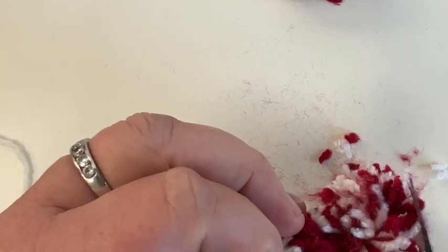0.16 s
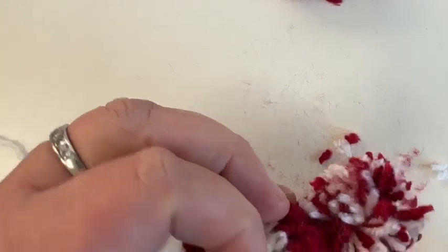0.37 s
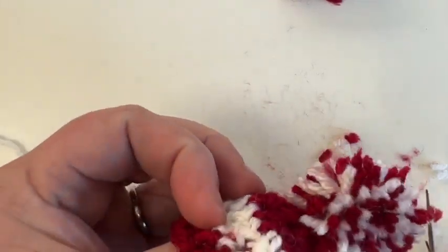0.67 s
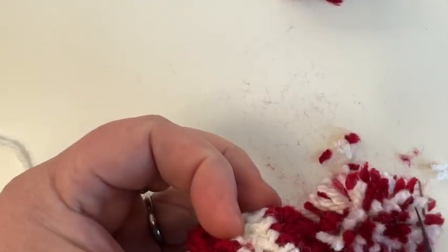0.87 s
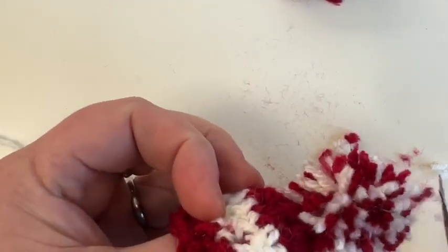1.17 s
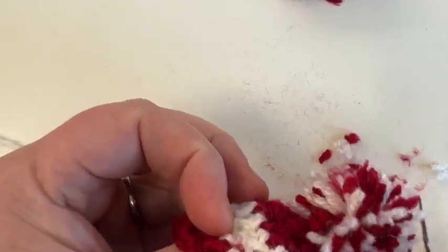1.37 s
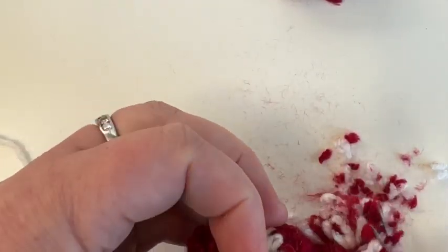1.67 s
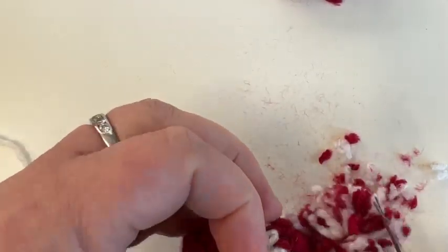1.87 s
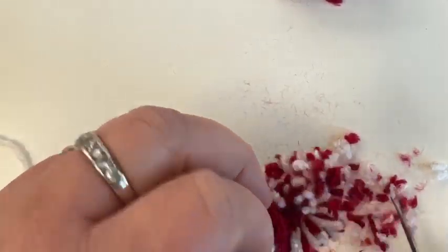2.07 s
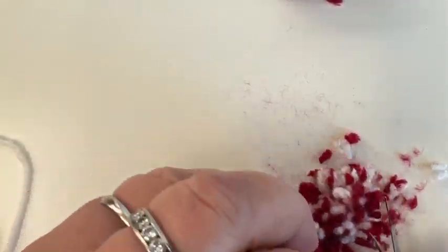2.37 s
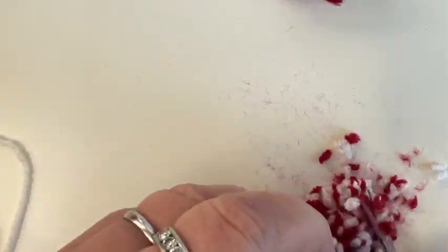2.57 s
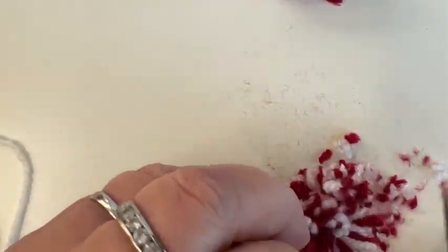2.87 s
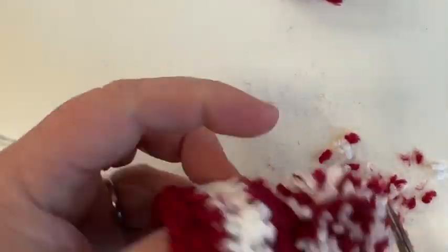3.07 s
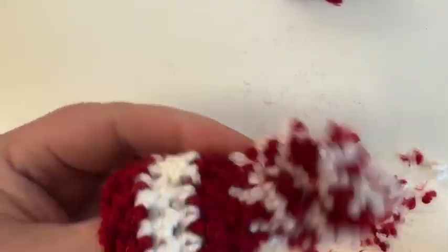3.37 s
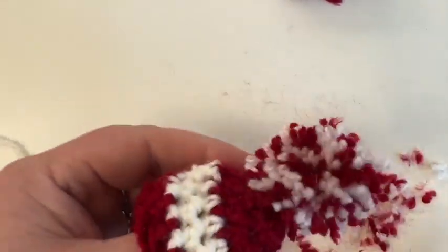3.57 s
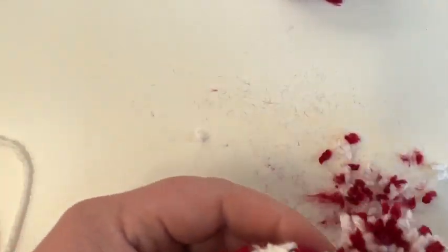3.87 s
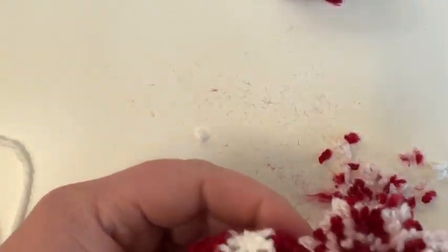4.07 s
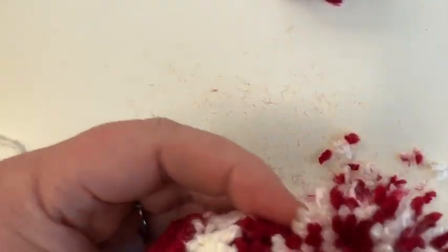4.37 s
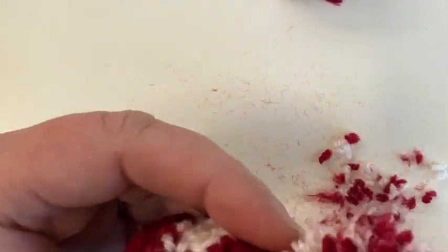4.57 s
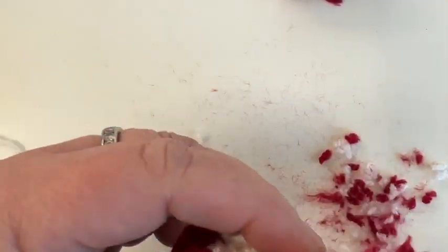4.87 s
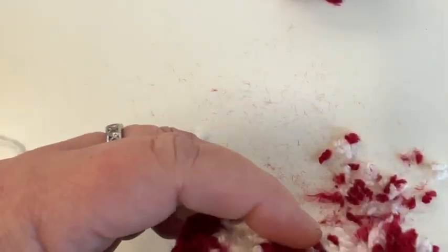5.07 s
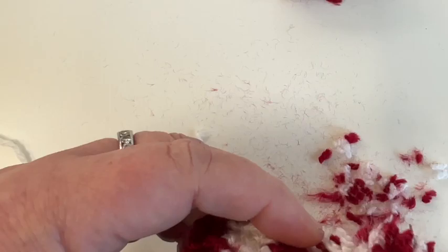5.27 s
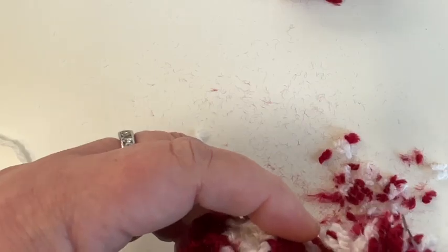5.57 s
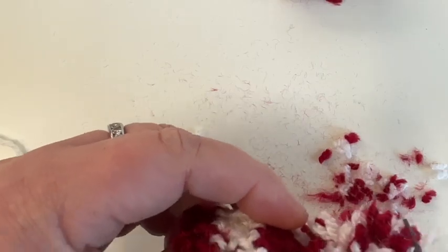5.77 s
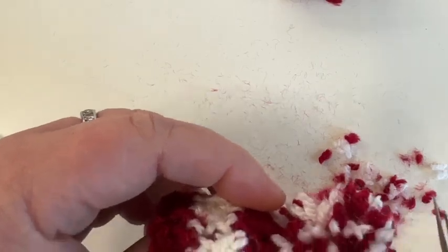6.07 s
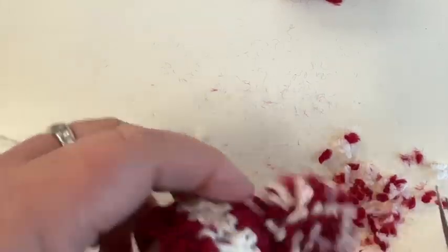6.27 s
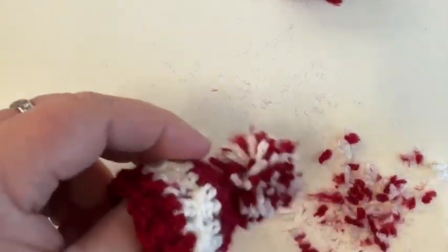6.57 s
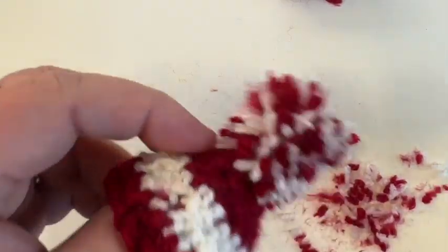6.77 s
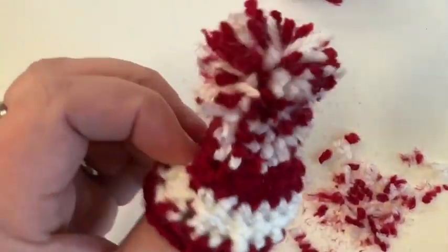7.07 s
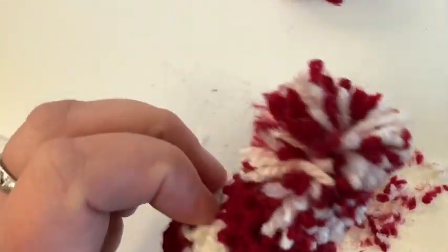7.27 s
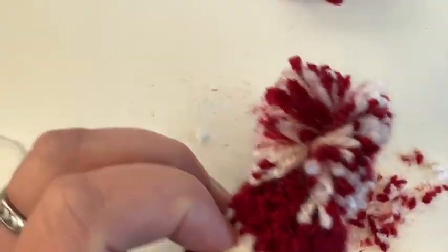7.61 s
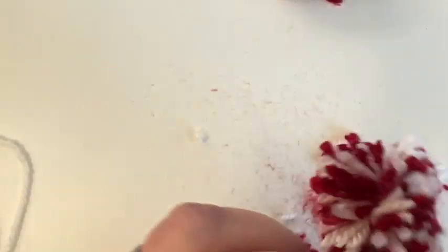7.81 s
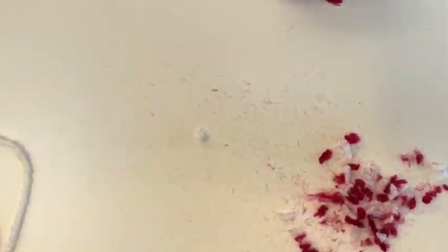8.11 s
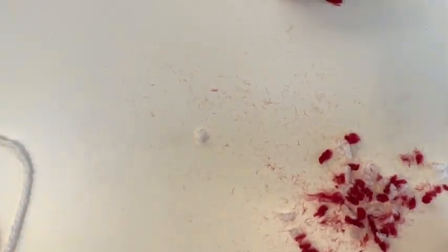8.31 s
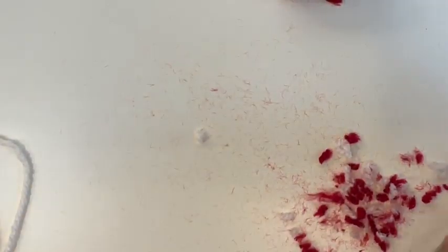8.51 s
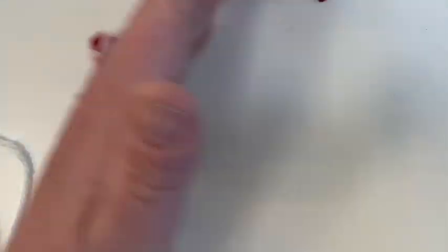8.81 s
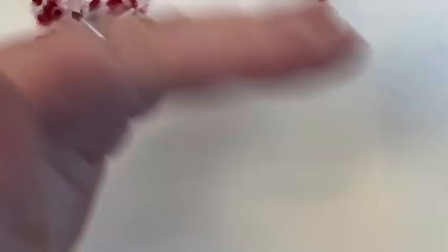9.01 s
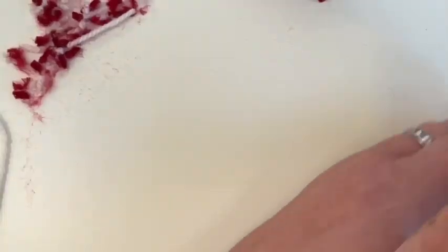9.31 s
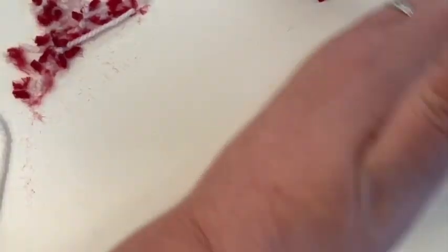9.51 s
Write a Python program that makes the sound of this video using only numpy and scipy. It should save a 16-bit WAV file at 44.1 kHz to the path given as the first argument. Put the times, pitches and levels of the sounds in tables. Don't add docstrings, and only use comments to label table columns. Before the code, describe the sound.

A quiet room with faint low rumble and soft ventilation hum, heard close by a phone. From 0 to 0.25 s small scissors shear yarn in rapid gritty snips, ending in a bright metallic click. More snips come around 0.9-1.05, 1.7-1.95 and 2.5 s, with faint blade slides as they open. At 2.8 s the scissors knock the table, blades jangling, with a brief rattle. It is mostly quiet, with tiny clicks near 3.55 and 4.2 s, until crunchy cutting at 5.5-5.75 s ends in a sharp snap; light clicks follow and another strong snap at 6.6 s. Wool rustles. The scissors are laid down at 7.15 s, then drop and rattle woodenly at 7.43-7.75 s. Two small clicks near 7.9 s. A palm lands softly at 8.13 s and sweeps with a swelling, hissing rub until 8.9 s; a low thump and second stroke run from 9.2 to about 9.65 s.

```python
import sys
import numpy as np
from scipy import signal
from scipy.fft import rfft, irfft
from scipy.io import wavfile
from scipy.ndimage import uniform_filter1d

SR = 44100
rng = np.random.default_rng(int(sys.argv[2]) if len(sys.argv) > 2 else 0)


def voltage_ratio(decibels):
    exponent = np.asarray(decibels, float) / 20
    return 10 ** exponent


def master_out(mix):
    frames = np.transpose(np.atleast_2d(mix))
    ceiling = np.clip(frames, -1, 1)
    pcm = np.round(ceiling * 32767).astype(np.int16)
    wavfile.write(sys.argv[1], SR, pcm)


N = 425562
HZ = np.fft.rfftfreq(N, 1 / SR)
TIME = np.arange(N) / SR

# (frequency [Hz], width [Hz], level [dB])
BLADE_MODES = [(1320, 130, -17), (2800, 260, -5), (3026, 180, -11), (4120, 850, -4), (4530, 900, -6.5),
               (6220, 450, -0.5), (7230, 460, 1), (8320, 720, -2.5), (10340, 900, -6), (11670, 400, -5),
               (15430, 1100, 1.5)]
# (frequency [Hz], level [dB], t60 [s])
TABLE_MODES = [(110, -5, 0.36), (135, 0.5, 0.092), (217.2, 3, 0.18), (280, 4.5, 0.06), (357.5, -1.5, 0.23),
               (413, -6.5, 0.21), (499, 6.5, 0.084), (660, 4, 0.068), (753, -1.5, 0.087), (865, -13, 0.1),
               (1020, -14, 0.025), (1114, -2, 0.012), (1396, -10, 0.022), (1676, -9, 0.01),
               (1880, -13, 0.0067), (2120, -12.5, 0.022), (2640, -21.5, 0.022)]
BOUNCE_SAMPLES = 75


def evened(x):
    return x / np.sqrt(np.mean(x ** 2) + 1e-30)


def peaked(x):
    return x / abs(x).max()


def read(points, hz):
    f, value = np.transpose(points)
    return np.interp(np.log(hz + 1), np.log(f + 1), value)


def colour(x, gain):
    return irfft(rfft(x) * gain, N)


def band(lo_hz, hi_hz):
    return 1 / np.sqrt((1 + (lo_hz / (HZ + 1)) ** 8) * (1 + (HZ / hi_hz) ** 8))


def resonance(hz, width_hz):
    return 1 / (1 + (2 * (HZ - hz) / width_hz) ** 2)


def add(mix, s, sound):
    part = mix[round(s * SR):][:len(sound)]
    part += sound[:len(part)]


def play(tables, layers, release_s):
    out = np.zeros(N)
    for rows in tables:
        s, level_db, *rel_db = np.transpose(rows)
        end_s = s[-1] + release_s
        at = slice(max(round(s[0] * SR), 0), min(round(end_s * SR), N))
        t = TIME[at]
        fade = np.clip(np.minimum(t - s[0], end_s - t) / 0.00077, 0, 1)
        for layer, db in zip(layers, [0 * s] + rel_db):
            out[at] += fade * voltage_ratio(np.interp(t, s, level_db + db)) * layer[at]
    return out


def grit(per_s, spread_db, flicker_db, flicker_s):
    slips = (rng.random(N) < per_s / SR) * rng.choice([-1., 1.], N)
    size_db = spread_db * np.minimum(rng.exponential(1, N), 4)
    span = max(int(flicker_s * SR), 2)
    smooth = uniform_filter1d(uniform_filter1d(rng.standard_normal(N), span), span)
    return slips * voltage_ratio(size_db + flicker_db * evened(smooth))


def air():
    # (frequency [Hz], level [dB])
    hush_curve = [(22, -8.5), (34, -1.5), (48, 0), (70, -2), (120, -5), (200, -8), (320, -13), (600, -23),
                  (1100, -34), (2000, -37), (4000, -42.5), (7000, -45.5), (11000, -48.5), (15000, -55)]
    # (frequency [Hz], level [dB])
    wide_curve = [(40, -25.5), (100, -9.5), (200, -3), (400, -4.5), (700, -6), (1100, -16.5), (1800, -31),
                  (3000, -41.5), (4000, -38.5)]
    # (frequency [Hz], width [Hz], level [dB])
    fan_tones = [(196.1, 5.2, -71), (221.7, 9, -72.5)]
    a, b, c, d, e = rng.standard_normal((5, N))
    common = voltage_ratio(-63) * evened(colour(a, voltage_ratio(read(hush_curve, HZ)) * band(45, 16000)))
    hum = sum(voltage_ratio(db) * evened(colour(c, resonance(hz, width))) for hz, width, db in fan_tones)
    waver, swell = (evened(colour(v, band(.1, 6.))) for v in (d, e))
    drone_hz = 48.8 + 5.5 * waver
    drone = voltage_ratio(-62 + 3.4 * swell) * np.sin(2 * np.pi * np.cumsum(drone_hz) / SR)
    apart = voltage_ratio(-73) * evened(colour(b, voltage_ratio(read(wide_curve, HZ)) * band(29.78, 4500)))
    return common + hum + drone, apart


def cut(start, parted, db, swell_db, tip_db):
    bite_s, loaded_s, part_s = 0.02, 0.011, 0.01
    s = [start, start + bite_s, parted - loaded_s, parted, parted + part_s]
    level_db = [-17 - swell_db, -swell_db, 0, -0.5, -39.5]
    middle_db = [4, 4, 0, 0, 0]
    return [(t, db + a, -12.5, b, tip_db) for t, a, b in zip(s, level_db, middle_db)]


def opening(start, full, let_go, db, tip_db, handle_db=1.5):
    shape = (start, -14.5), (full, 0), (let_go, 0), (let_go + 0.051, -26)
    middle_db = 0.5
    return [(t, db + a, handle_db, middle_db, tip_db) for t, a in shape]


def shearing():
    # (start [s], fibres parted [s], peak [dB], swell on the way [dB], tips [dB])
    snips = [(-.03, 0.098, -72, 4.5, -4), (0.09, 0.158, -57, 9, 0.5), (0.15, 0.218, -55.5, 9.5, 0),
             (0.889, 0.978, -55, 13.5, -1), (0.968, 1.016, -52, 9, 8.5), (1.718, 1.804, -64.5, 11, 5),
             (1.802, 1.877, -56, 3.5, 6), (2.516, 2.592, -59, 1.5, 0.5), (5.488, 5.637, -64, 16.5, 4),
             (5.64, 5.671, -56.5, 0, 5.5), (5.666, 5.722, -52.5, 7.5, 5.5)]
    # (start [s], full [s], let go [s], level [dB], tip modes [dB])
    slides = [
        (0.35, 0.362, 0.408, -74, -9),
        (1.134, 1.155, 1.166, -67, -6),
        (2.002, 2.07, 2.052, -64, -11),
        (5.893, 5.9, 5.91, -76, -11),
    ]
    jolt = (2.806, 2.811, 2.84, -38, -5)
    rings = [voltage_ratio(db) / (1 + 1.3j * (HZ - hz) / width) ** 2 for hz, width, db in BLADE_MODES]
    drive = grit(11000, 2.1, 1.7, 0.003)
    still = 1 - 0.65 * resonance(3430, 300)
    groups = rings[1:3], rings[:1], rings[3:5], rings[5:]
    root, handle, middle, tips = (evened(colour(drive, sum(group) * still)) for group in groups)
    moves = [cut(*row) for row in snips] + [opening(*row) for row in slides]
    moves.append(opening(*jolt, handle_db=-12))
    return play(moves, [root, handle, middle, voltage_ratio(4.0) * tips], 0)


def clicks():
    # (time [s], peak [dB], root modes [dB], handle mode [dB], liveliest tip region [Hz])
    contacts = [(0.2534, -24, -12, -44, 6600), (0.347, -59, -13, -1, 6410), (1.0409, -42.5, -9, -33, 7300),
                (1.1298, -58, -4, 1, 8350), (1.93, -48.5, -7.5, -32, 6600), (3.55, -67, 2.5, -20, 6340),
                (4.2226, -66, -10.5, -26.5, 7400), (5.748, -21, -15.5, -49, 7230),
                (5.901, -71.5, -9, 9, 7660), (6.2346, -49, -23, -26, 6700), (6.299, -49, -21, -30, 6900),
                (6.6008, -17.5, -16.5, -50, 7230), (6.8844, -69, -33, -26, 6140),
                (6.906, -48.5, -17, -24, 7680), (7.9076, -45.5, -3.5, -1.5, 8640),
                (7.9464, -40, -12, -27, 6400)]
    out, t = np.zeros(N), TIME[:2000]
    hz, width, mode_db = np.transpose(BLADE_MODES)[:, :, None]
    decay = np.sqrt(t * width) * np.exp(-np.pi * 2.2 * width * t)
    modes = voltage_ratio(mode_db) * decay * np.sin(2 * np.pi * hz * t)
    thin = signal.butter(4, 2650, "high", fs=SR, output="sos")
    modes[1:] = signal.sosfilt(thin, modes[1:])
    burst = np.sqrt(TIME[:110]) * np.exp(-TIME[:110] / 0.00049)
    chance = rng.standard_normal((len(contacts), 110))
    for (s, db, root_db, handle_db, lively_hz), draw in zip(contacts, chance):
        contact = np.diff(draw * burst)
        contact += 0.7 * np.roll(contact, 52)
        near_tip = modes[5:] * (0.79 + np.exp(-((hz[5:] - lively_hz) / 1200) ** 2))
        groups = near_tip, modes[1:3], modes[:1]
        tips, root, handle = (peaked(np.convolve(contact, m.sum(0))) for m in groups)
        add(out, s - .0004, voltage_ratio(db) * (tips + voltage_ratio(root_db) * root + voltage_ratio(handle_db) * handle))
    return out


def thumps():
    # (time [s], peak [dB], settling pitch [Hz], t60 [s], extra starting pitch [share])
    flesh = [
        (1.648, -54.5, 141, 0.15, 0.65),
        (2.108, -45.5, 126, 0.15, 0.54),
        (3.293, -53.5, 199.4, 0.31, 0.99),
        (6.92, -46.5, 233, 0.056, 0.92),
        (6.999, -35.5, 128, 0.03, 0.47),
        (8.131, -28, 160, 0.046, 0.41),
        (8.173, -45, 110, 0.31, 0.36),
        (9.185, -37, 67.4, 0.17, 0.4),
        (9.216, -35, 43.1, 0.33, 0.33),
        (9.268, -43.5, 47.2, 0.2, 0.58),
    ]
    fingertip = [
        (0.81, -53.5, 280, 0.068, 4.1),
    ]
    hard_driven = [
        (2.81, -31, 278, .25, .05),
        (2.81, -36, 655, .12, .02),
        (7.148, -34, 440, .1, .05),
        (7.272, -38, 215, .12, .05),
        (7.44, -30, 216, .3, .05),
    ]
    out, t = np.zeros(N), TIME[:15000]
    shudder = evened(colour(rng.standard_normal(N), band(60, 216)))
    for s, db, hz, t60, sink in flesh + fingertip + hard_driven:
        turns = np.cumsum(hz * (1 + sink * np.exp(-t * hz * 1.1))) / SR
        push = voltage_ratio(db - 60 * t / t60) * (1 - np.exp(-t * hz * 6.3)) * np.sin(2 * np.pi * turns)
        envelope = voltage_ratio(db - 14.0 - 60 * t / 0.36) * (1 - np.exp(-t / 0.0029))
        after = envelope * shudder[round(s * SR):][:len(t)]
        add(out, s, push + after)
    return out


def gesture(start, top, end, db, *colour_db):
    edge_db, shoulder_db = -19.5, -7.5
    shape = ((start, edge_db), ((start + top) / 2, shoulder_db), (top, 0),
             ((top + end) / 2, shoulder_db), (end, edge_db))
    return [(t, db + a, *colour_db) for t, a in shape]


def rubbing():
    # (frequency [Hz], level [dB])
    skin_curve = [(500, -10), (1000, -10.5), (1800, -3), (2600, 2), (3200, -5.5), (4000, -5.5), (5500, -2),
                  (7000, -0.5), (9000, 1), (12000, 1), (15000, 2)]
    # (time [s], resonance [Hz])
    hollow_path = [(3., 4070), (3.2, 2800), (3.9, 4160), (6.45, 2540), (6.58, 3860), (6.76, 2960),
                   (6.84, 3980), (6.9, 4700), (6.95, 5530), (7.11, 5470), (7.7, 2800), (8.15, 3020),
                   (8.75, 4100), (8.89, 4800), (8.97, 4280), (9.16, 4470), (9.55, 3640)]
    # (frequency [Hz], width [Hz], level [dB])
    pockets = [(800, 700, -1), (2890, 590, -1.5), (4400, 600, -3), (5500, 580, -6.5)]
    # (start [s], strongest [s], end [s], level [dB])
    scrapes = [
        (1.49, 1.528, 1.58, -75.5),
        (1.96, 2.1, 2.2, -72),
        (3.686, 3.71, 3.76, -70),
        (7.5, 7.53, 7.75, -67),
        (7.9, 7.913, 7.95, -68.5),
        (6.43, 6.462, 6.52, -77),
        (6.9, 7.006, 7.2, -73),
        (3.29, 3.33, 3.39, -79),
    ]
    # (start [s], strongest [s], end [s], level [dB], brightness [dB])
    fumbles = [(2.8, 2.87, 3.03, -65, 3), (2.958, 3.05, 3.087, -70, -13), (3.15, 3.225, 3.3, -75.5, -5.5),
               (3.31, 3.35, 3.41, -76, -1.5), (3.488, 3.537, 3.54, -82, -9), (3.678, 3.693, 3.86, -85, 0),
               (3.9, 3.94, 4.0, -84.5, -0.5), (6.138, 6.242, 6.37, -76.5, -1.5),
               (6.415, 6.485, 6.6, -76.5, 3), (6.519, 6.594, 6.62, -64.5, -3),
               (6.588, 6.68, 6.85, -68.5, 2.5), (6.717, 6.87, 6.95, -68, -17),
               (6.876, 6.95, 7.28, -66, -4.5), (7.56, 7.668, 7.76, -78, 7.5),
               (7.734, 7.86, 8.0, -67.5, -1.5), (7.902, 8.01, 8.2, -71.5, 3),
               (8.874, 8.938, 9.14, -72.5, 3), (9.008, 9.156, 9.26, -79, -4)]
    # (start [s], strongest [s], end [s], level [dB])
    hand_lifts = [
        (6.865, 6.983, 7.56, -66.5),
        (8.843, 8.946, 9.27, -68.5),
        (8.987, 9.145, 9.24, -69.5),
    ]
    # (time [s], level [dB])
    strokes = [
        [(8.11, -84.5), (8.184, -61.5), (8.38, -57.5), (8.434, -60), (8.582, -49), (8.784, -47.5),
         (8.886, -51.5), (8.92, -69.5)],
        [(9.167, -66), (9.197, -54), (9.385, -58), (9.431, -52.5), (9.585, -48), (9.65, -55.5)],
    ]

    drive = grit(20000, 1.2, .6, .01)
    parts = band(3820, 3950), band(5200, 14000), band(230, 1670)
    middle, high, low = (evened(colour(drive, voltage_ratio(read(skin_curve, HZ)) * part)) for part in parts)
    hollow_hz = np.interp(TIME, *np.transpose(hollow_path))
    under_hand = np.exp(2j * np.pi * np.cumsum(hollow_hz) / SR)
    finger_gap = np.exp(2j * np.pi * 8340 * TIME)
    first, second = (evened((z * signal.lfilter(*signal.butter(2, width_hz, fs=SR), drive / z)).real)
                     for z, width_hz in ((under_hand, 450), (finger_gap, 1000)))
    hollow = first + voltage_ratio(-14.5) * second + voltage_ratio(-8.5) * evened(colour(drive, band(4800, 4300)))
    cuff = evened(colour(drive, sum(voltage_ratio(db) * resonance(hz, width) for hz, width, db in pockets)))

    wool = [gesture(*row, -7, -9 - 0.29 * row[-1]) for row in fumbles]
    palm = [[(s, db, 1.5, -13.5, min(4.2 * (db + 46), 0) - 8) for s, db in rows] for rows in strokes]
    layers = [voltage_ratio(-6.5) * middle, voltage_ratio(2.5) * high, low, hollow]
    lifted = play([gesture(*row) for row in hand_lifts], [cuff], .03)
    scraped = play([gesture(*row) for row in scrapes], [low], .03)
    return lifted + play(wool, layers, .03) + play(palm, layers, .004) + scraped


def board(draw, t):
    hz, db, t60 = np.transpose(TABLE_MODES)[:, :, None]
    late = np.maximum(t - 0.0517 / np.sqrt(hz), 0)
    spot = draw[:len(TABLE_MODES), None]
    strength = np.sign(spot) * (1.9 + abs(spot))
    modes = strength * voltage_ratio(db - 60 * late / t60) * np.sin(2 * np.pi * hz * late)
    return (peaked(group.sum(0)) for group in (modes[:9], modes[9:13], modes[13:]))


def knocks():
    # (time [s], peak [dB], upper modes [dB], tick [dB], body [dB])
    hits = [(2.801, -55, 10.5, 4, 2.5), (2.809, -31, 2.5, -4, 0.5), (2.816, -34, -3, -3, -3),
            (2.825, -42, 13, 4.5, -3), (3.687, -71, 12.5, -8, -23), (7.136, -39.5, -2.5, -16, -4),
            (7.145, -17, -0.5, -15, -9), (7.174, -36, -1.5, -15, -25.5), (7.275, -39.5, 1.5, -11, 8),
            (7.372, -52, 8, -3, 2.5), (7.434, -20, -2, -9, 1.5), (7.454, -25, 4, 1.5, 4.5),
            (7.462, -24.5, 2.5, -4, 5.5), (7.476, -35, 11, -0.5, 10), (7.483, -33, 3.5, -5.5, 6.5),
            (7.501, -31, 5, 2.5, 2), (7.515, -43.5, -5.5, -33, 12.5), (7.593, -40, 2.5, -12, -1),
            (7.661, -45.5, -0.5, -11, 8.5), (7.708, -45.5, -4.5, -26, -16), (7.739, -45.5, -16, -15.5, -1),
            (7.194, -43.5, 5, -9.5, -4), (7.233, -43, 3.5, -7, -3), (7.354, -51, 4.5, -10, -4.5),
            (7.506, -39, 4, -7, 0), (7.598, -44.5, 0, -11, 2.5), (7.424, -43.5, -5.5, -11, -6),
            (7.184, -38, 5, -7.5, -4.5)]
    out, t = np.zeros(N), TIME[:12000]
    tick_decay = np.exp(-t[:2000] / 0.001) + 0.0985 * np.exp(-t[:2000] / .01)
    chance = rng.standard_normal((len(hits), 2020))
    for (s, db, upper_db, tick_db, body_db), draw in zip(hits, chance):
        body, middle, upper = board(draw, t)
        tick = np.convolve(np.diff(draw[19:]) * tick_decay, [.25, .75, 1, .75, .25])
        add(out, s - .001, voltage_ratio(db) * (middle + voltage_ratio(upper_db) * upper + voltage_ratio(body_db) * body))
        add(out, s, voltage_ratio(db + tick_db) * peaked(tick))
    return out


def rocking(start, top, db, length, body_db):
    shape = (start, -9), (top, 0), (top + 0.18 * length, -15.5), (top + length, -30.5)
    return [(t, db + a, body_db) for t, a in shape]


def dragging():
    # (start [s], strongest [s], level [dB], dies over [s], body [dB])
    rattles = [
        (2.831, 2.838, -33, 0.17, -6),
        (7.146, 7.161, -38.5, 0.33, 4.5),
        (7.351, 7.365, -54.5, 0.14, 0),
        (7.222, 7.27, -41, 0.14, -0.5),
        (7.439, 7.466, -27.5, 0.12, 6.5),
        (7.497, 7.504, -39.5, 0.31, 13.5),
    ]
    # (frequency [Hz], level [dB])
    wood_curve = [(60, -20), (110, -8.5), (220, 4.5), (500, 2), (900, -16.5), (1300, -26), (1900, -16),
                  (2600, -26.5), (4000, -27), (6000, -6), (9000, -38), (12000, -38), (15000, -45.5)]
    drive = grit(6000, 2., 1.8, 0.004)
    rings = sum(voltage_ratio(db) / (1 + 2j * (HZ - hz) * t60 / 4.4) for hz, db, t60 in TABLE_MODES)
    gain = rings + voltage_ratio(read(wood_curve, HZ))
    parts = band(900, 3100) + 0.24 * band(3400, 16150), band(140, 560)
    upper, body = (evened(colour(drive, gain * part)) for part in parts)
    return voltage_ratio(-6.) * play([rocking(*row) for row in rattles], [upper, body], .025)


def room(x):
    # (frequency [Hz], t60 [s])
    t60_curve = [(100, 0.71), (300, 0.27), (800, 0.42), (2000, 0.31), (5000, 0.1), (12000, 0.24)]
    # (frequency [Hz], level [dB])
    apart_curve = [(100, -27.5), (300, -17), (700, -0.5), (1300, -5.5), (2200, -21.5), (4000, -10)]
    taps = np.zeros((2, SR // 2))
    at = np.arange(260, SR // 2 - 20, 20) + rng.integers(0, 20, (2, (SR // 2 - 261) // 20))
    np.put_along_axis(taps, at, rng.choice([-1., 1.], at.shape), 1)
    hz, t, z = signal.stft(taps, SR, nperseg=256)
    tail = signal.istft(z * voltage_ratio(-60 * t / read(t60_curve, hz)[:, None]), SR, nperseg=256)[1]
    common, apart = signal.fftconvolve(x[None], tail / np.linalg.norm(tail[0]), axes=1)[:, :N]
    return common, colour(apart, voltage_ratio(read(apart_curve, HZ)) * band(76, 4500))


def ports(x, slant):
    # (frequency [Hz], phase [rad])
    phase_curve = [(0, 0), (4200, 0), (4700, -1.2), (5000, -3.1), (5350, -5.4), (5800, -6.28),
                   (8000, -6.28), (8500, -7.3), (11000, -8.1), (12000, -8.9), (12600, -9.36),
                   (14500, -9.42), (15300, -9.18)]
    lead = np.exp(.5j * read(phase_curve, HZ * slant))
    return np.array([colour(x, lead), colour(x, 1 / lead)])


def scene():
    hush, hush_apart = air()
    cutting, snips = shearing(), clicks()
    pushes, skin = thumps(), rubbing()
    blows = knocks()
    table = blows + dragging() + pushes
    near = cutting + snips + skin + table
    wet, wet_apart = room(near)
    apart = voltage_ratio(-6.5) * wet_apart + hush_apart
    apart -= 0.065 * colour(table, band(100, 1500))
    bounce = voltage_ratio(-8.5) * colour(np.roll(near + hush, BOUNCE_SAMPLES), band(4750, 3500))
    bounce += voltage_ratio(-1.0) * colour(hush[::-1], band(4600, 7800))
    bounce += voltage_ratio(-12.0) * np.roll(skin, 3 * BOUNCE_SAMPLES)
    both = voltage_ratio(-17.5) * np.roll(np.diff(blows + snips, prepend=0), BOUNCE_SAMPLES) + voltage_ratio(-21.0) * skin
    direct, indirect = ports(near + hush, 0.99), ports(voltage_ratio(-17.0) * wet + bounce, 0.94)
    return direct + indirect + np.outer([1, -1], apart) + both


def band_limit(x):
    return signal.sosfilt(signal.butter(12, 16710, fs=SR, output="sos"), x)


def record(dry):
    overloaded = .3 * np.tanh(dry / .3)
    limited = np.array([colour(side, (HZ < 15850) * (HZ > 33)) for side in overloaded])
    return band_limit(limited)


dry = scene()
out = record(dry)
master_out(out)
```